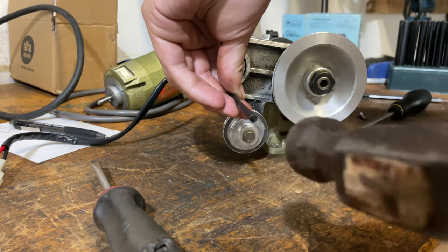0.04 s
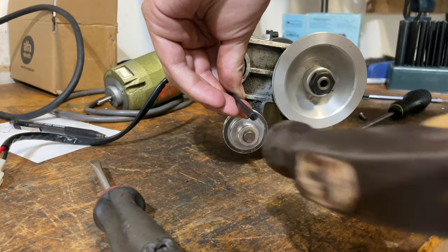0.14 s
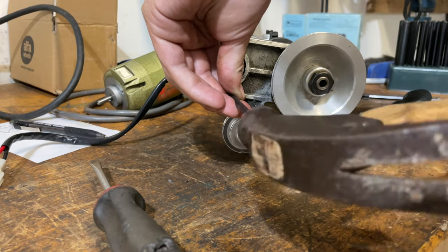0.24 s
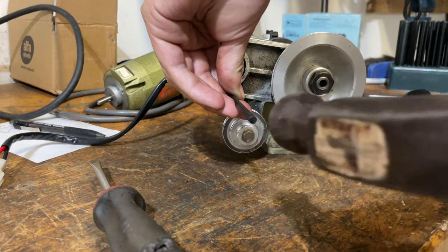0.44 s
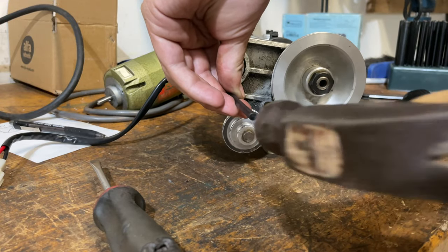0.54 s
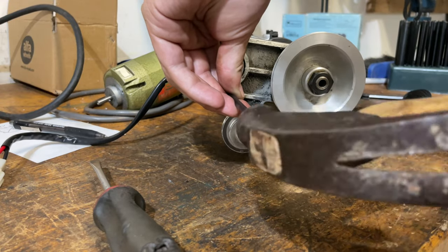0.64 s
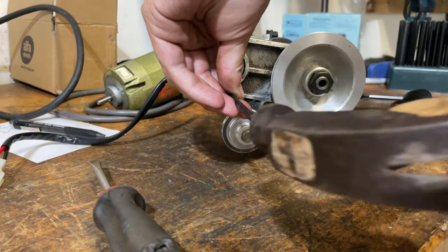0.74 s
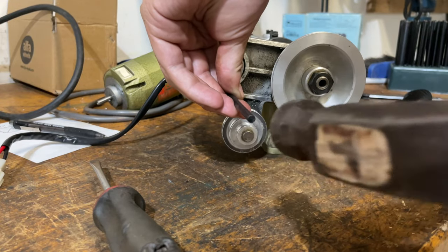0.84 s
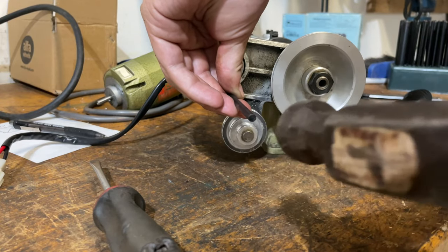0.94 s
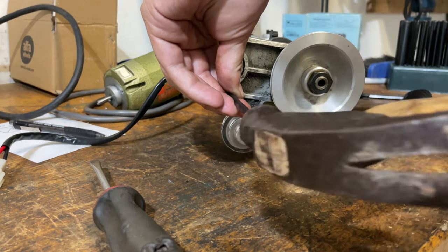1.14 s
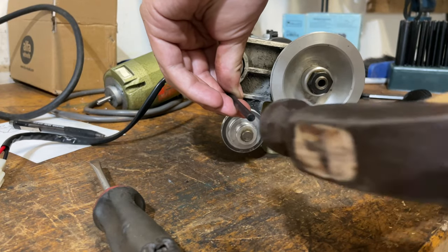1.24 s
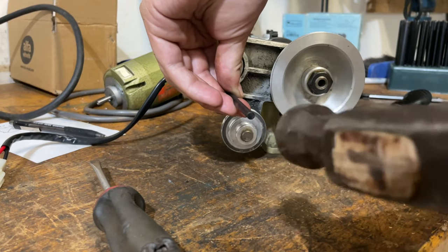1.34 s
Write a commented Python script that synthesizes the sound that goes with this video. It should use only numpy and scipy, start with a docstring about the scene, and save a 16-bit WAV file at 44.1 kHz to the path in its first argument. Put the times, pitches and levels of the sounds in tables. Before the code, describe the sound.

Hammer taps on a steel punch over a wooden workbench, heard close. The fading tail of an earlier tap opens over low room rumble. Sharp cracks follow at about 0.22, 0.62 and 1.08 seconds, each with a very short high steel ring and woody knock. Dull clacks come around 0.02 seconds later, doubled after the last. Peaks are softly overloaded; a small workshop rings on briefly.

```python
"""The fading tail of a hammer tap struck just before the start, over low room noise; then three more taps.
A hammer strikes a steel punch held in a metal part on a wooden workbench, close to the microphone.
Each tap is a noise crack and a short ring of dying sines for the steel, then modes and noise for the bench.
A small workshop rings on as decaying noise, and dull clacks follow as the work drops back on the bench.
The loud attacks overload the microphone: a soft limiter rounds their peaks."""
import sys
import numpy as np
from scipy import signal
from scipy.fft import rfft, irfft
from scipy.io import wavfile

SR = 44100
rng = np.random.default_rng(int(sys.argv[2]) if len(sys.argv) > 2 else 0)


def transcribe(signal):
    """Save signal, clipped to [-1, 1], as a 16-bit WAV file at the path in sys.argv[1]."""
    frames = np.atleast_2d(signal).T
    limited = np.clip(frames, -1, 1)
    pcm = np.round(limited * 32767).astype(np.int16)
    wavfile.write(sys.argv[1], SR, pcm)


N = 61739  # length in samples

# hammer taps, each with its own balance: start_s, force_db, bench_db, bench_tilt_db_per_octave,
# plate_db, plate_tilt_db_per_octave, punch_db, treble_db
TAPS = [(-0.21, 0.5, -9.5, 9.5, 5, 13, -2.5, -8), (0.2215, -0.5, 2.5, -0.5, 6, 3, -5, -1.5),
        (0.6204, -2, 2.5, -1, 2.5, 15, -5.5, -6.5), (1.0769, -0.5, 2.5, -0.5, -10.5, 7.5, 1, -0.5)]
# the work dropping back on the bench: start_s, level_db
REBOUNDS = [(0.2479, -9), (0.6408, -7), (1.0976, -10.5), (1.1083, -9.5)]

# steady room noise: frequency_hz, relative_level_db (per Hz)
FLOOR_SPECTRUM = [(10, 14.5), (45, -3), (80, -10), (130, -20.5), (180, -21), (350, -25), (900, -27.5),
                  (2000, -43), (8000, -51.5), (16000, -59)]
# workshop reverberation, decay by band: frequency_hz, t60_s
ROOM_T60 = [(60, 0.63), (150, .5), (400, 0.44), (1000, 0.5576), (2500, 0.53), (5000, 0.6062), (8000, 0.55),
            (11000, 0.5367), (13500, 0.42), (16000, 1.16)]
# diffuse wash that a tap leaves in the workshop: frequency_hz, relative_level_db (per Hz)
WASH_SPECTRUM = [(30, -4), (120, 1), (180, 2.5), (260, 2.5), (480, -2), (660, -2.5), (850, -2), (1200, -7),
                 (2000, -17.5), (3000, -19.5), (4000, -24), (5500, -20.5), (7000, -14.5), (8500, -14.5),
                 (10500, -22.5), (13500, -25), (16000, -34)]
# crack of steel on steel: frequency_hz, relative_level_db (per Hz)
CRACK_SPECTRUM = [(300, -4.5), (1500, -11.5), (2600, -5), (4000, -12.5), (5500, -7.5), (7000, -2),
                  (8200, 4.5), (9600, -1), (10800, -5), (13500, -10), (16000, -11.5)]
# dense higher modes of the bench and the things lying on it: frequency_hz, relative_level_db (per Hz)
WOOD_SPECTRUM = [(60, -7.5), (250, -18), (500, -2), (660, -4), (850, 0.5), (1250, -7.5), (1700, -15.5),
                 (2600, -22.5), (6000, -32)]

# modes of the hammer head: pitch_hz
HEAD_HZ = [4628, 6950, 7715, 8240, 8646, 9030, 9420]
# the same modes in order, balanced alike at every tap: level_db, t60_s
HEAD_MODES = [(-21.5, 0.063), (-32.5, 0.031), (-16, 0.058), (-14.5, 0.049), (-13, 0.039), (-16.5, 0.018),
              (-15.5, .025)]
# modes of the plate under the punch: pitch_hz
PLATE_HZ = [2300, 2647, 3285, 3600, 4391]
# the same modes in order, before tilt: level_db, t60_s
PLATE_MODES = [(-17.5, 0.022), (-34, 0.17), (-12.5, 0.022), (-9.5, 0.033), (-22, 0.061)]
# modes of the wooden bench top: pitch_hz
BENCH_HZ = [46, 116, 127, 152, 275, 364, 412, 490, 522, 570, 758, 824, 900, 990]
# the same modes in order, before tilt: level_db, t60_s
BENCH_MODES = [(-24, 0.39), (-15, 0.22), (-15.5, 0.12), (-26, 0.29), (-21.5, 0.29), (-19.5, 0.16),
               (-17, 0.14), (-5.5, 0.061), (-2, 0.044), (-11, 0.087), (-10.5, 0.094), (-12.5, 0.11),
               (-12.5, 0.08), (-20, 0.099)]

# levels in dB, times and t60 in seconds
FLOOR_DB, HUM_DB, HUM_HZ = -43.5, -62, 183
ROOM_DELAY_S, ROOM_BUILD_S, WASH_DB = 0.013, 0.0088, -19.5
# how strongly each ringing part feeds the room
HEAD_ROOM_DB, PLATE_ROOM_DB, PUNCH_ROOM_DB, BENCH_ROOM_DB = -15, -18, -9, -15.5
CRACK_DB, CRACK_RISE_S, CRACK_T60_S = 4, 0.0016, 0.011
CLATTER_DB, CLATTER_T60_S = -7, 0.049
TREBLE_HZ = 11000  # centre of the treble shelf's slope
STEEL_RISE_S = 0.0014
PUNCH_HZ, PUNCH_DB, PUNCH_T60_S = 7295, -5.5, 0.036
# pitches that a tilt leaves unchanged
BENCH_PIVOT_HZ, PLATE_PIVOT_HZ = 400, 3600
BENCH_LAG_S, BENCH_RISE_S = 0.0001, 0.00049
WOOD_DB, WOOD_RISE_S, WOOD_T60_S = -11, 0.0018, 0.1
ECHO_S, ECHO_DB = 0.009, -16  # reflection of the knock from a nearby surface
REBOUND_RISE_S, REBOUND_T60_S, REBOUND_CLICK_DB = 0.0025, 0.03, -22.5
OVERLOAD, KNEE = 0.97, 5  # limiter ceiling (1 = full scale) and hardness of its bend
EDGE_HZ = 15800  # upper band limit


def amp(db):
    """Decibels to gain."""
    return 10 ** (np.asarray(db) / 20)


def read(points, hz):
    """Reads a table on a log-frequency axis."""
    f, value = np.transpose(points)
    return np.interp(np.log(hz + 1), np.log(f + 1), value)


def add(mix, start_s, sound):
    """Mixes a sound in at its start time, which may lie before the scene begins."""
    at = round(start_s * SR)
    sound = sound[max(-at, 0):]
    part = mix[max(at, 0):][:len(sound)]
    part += sound[:len(part)]


def noise(spectrum, size):
    """Random-phase noise of rms 1, coloured by the given spectrum."""
    hz = np.fft.rfftfreq(size, 1 / SR)
    phases = np.exp(2j * np.pi * rng.random(len(hz)))
    x = irfft(amp(read(spectrum, hz)) * phases, size)
    return x / x.std()


def fade(t, t60_s):
    """Exponential decay that falls 60 dB in t60_s seconds."""
    return np.exp(-np.log(1000) * t / np.maximum(t60_s, 1e-4))


def rise(t, rise_s):
    """Soft attack from 0 to 1."""
    return 1 - np.exp(-(t / rise_s) ** 2)


def ring(pitches, modes, t, rise_s, sign=1):
    """Dying sines; sign -1 starts neighbours against each other, so the sound builds more slowly."""
    total = np.zeros(len(t))
    for k, (hz, (db, t60_s)) in enumerate(zip(pitches, modes)):
        total += sign ** k * amp(db) * fade(t, t60_s) * np.sin(2 * np.pi * hz * t)
    return rise(t, rise_s) * total


def tilted(pitches, modes, tilt_db, pivot_hz):
    """Tilts modes in dB per octave: the way the blow lands favours high or low ones."""
    return [(db + tilt_db * np.log2(hz / pivot_hz), t60_s)
            for hz, (db, t60_s) in zip(pitches, modes)]


def treble(x, db):
    """Raises or lowers the top of the spectrum with a steep shelf."""
    hz = np.fft.rfftfreq(len(x), 1 / SR)
    shelf = 1 / (1 + (TREBLE_HZ / (hz + 1)) ** 16)
    return irfft(rfft(x) * amp(db * shelf), len(x))


def background():
    """Low room rumble as shaped noise, with a faint steady sine for the hum."""
    rumble = amp(FLOOR_DB) * noise(FLOOR_SPECTRUM, N)
    hum = amp(HUM_DB) * np.sin(2 * np.pi * HUM_HZ * np.arange(N) / SR)
    return rumble + hum


def tail(x):
    """Shapes one second of noise into the room's tail, each band dying at its own speed."""
    hz, t, bands = signal.stft(x, SR, nperseg=256)
    decay = fade(t, read(ROOM_T60, hz)[:, None])
    x = signal.istft(bands * decay, SR, nperseg=256)[1][:SR]
    since_arrival = np.maximum(np.arange(SR) / SR - ROOM_DELAY_S, 0)
    return x * rise(since_arrival, ROOM_BUILD_S)


def workshop(notes, treble_db):
    """The room's answer to one tap: notes lingering through a noise reverb, and a broad wash."""
    response = tail(rng.standard_normal(SR))
    response = response / np.linalg.norm(response)
    lingering = signal.fftconvolve(notes, response)[:SR]
    wash = tail(treble(noise(WASH_SPECTRUM, SR), treble_db))
    return lingering + amp(WASH_DB) * wash


def crack(t, treble_db):
    """Steel on steel: one noise burst with a fast decay for the crack and a slower one for the clatter."""
    level = amp(CRACK_DB) * fade(t, CRACK_T60_S) + amp(CLATTER_DB) * fade(t, CLATTER_T60_S)
    burst = treble(noise(CRACK_SPECTRUM, len(t)), treble_db)
    return burst * rise(t, CRACK_RISE_S) * level


def hammer_head(t):
    """The steel head rings at its own high modes."""
    return ring(HEAD_HZ, HEAD_MODES, t, STEEL_RISE_S)


def plate(t, tilt_db):
    """The plate under the punch rings, its modes weighted by how the blow lands."""
    modes = tilted(PLATE_HZ, PLATE_MODES, tilt_db, PLATE_PIVOT_HZ)
    return ring(PLATE_HZ, modes, t, STEEL_RISE_S)


def punch(t):
    """The punch sounds a single short note of its own."""
    return ring([PUNCH_HZ], [(PUNCH_DB, PUNCH_T60_S)], t, STEEL_RISE_S)


def bench(t, tilt_db):
    """The blow reaches the bench top a moment later; a harder contact favours its higher modes."""
    t = np.maximum(t - BENCH_LAG_S, 0)
    modes = tilted(BENCH_HZ, BENCH_MODES, tilt_db, BENCH_PIVOT_HZ)
    knock = ring(BENCH_HZ, modes, t, BENCH_RISE_S, sign=-1)
    wood = [(hz, db + tilt_db * np.log2(hz / BENCH_PIVOT_HZ)) for hz, db in WOOD_SPECTRUM]
    dense = noise(wood, len(t)) * rise(t, WOOD_RISE_S) * fade(t, WOOD_T60_S)
    knock = knock + amp(WOOD_DB) * dense
    add(knock, ECHO_S, amp(ECHO_DB) * knock)
    return knock


def tap(bench_db, bench_tilt_db, plate_db, plate_tilt_db, punch_db, treble_db):
    """One blow: crack, ringing steel and bench knock, with the room they excite."""
    t = np.arange(SR) / SR
    head_ring = hammer_head(t)
    plate_ring = amp(plate_db) * plate(t, plate_tilt_db)
    punch_ring = amp(punch_db) * punch(t)
    knock = amp(bench_db) * bench(t, bench_tilt_db)
    room_send = amp(HEAD_ROOM_DB) * head_ring + amp(PLATE_ROOM_DB) * plate_ring
    room_send += amp(PUNCH_ROOM_DB) * punch_ring + amp(BENCH_ROOM_DB) * knock
    direct = crack(t, treble_db) + head_ring + plate_ring + punch_ring + knock
    return direct + workshop(room_send, treble_db)


def rebound():
    """The work lands again: a small dull clack of wood noise with a trace of steel."""
    t = np.arange(SR // 10) / SR
    clack = noise(WOOD_SPECTRUM, len(t)) + amp(REBOUND_CLICK_DB) * noise(CRACK_SPECTRUM, len(t))
    return clack * rise(t, REBOUND_RISE_S) * fade(t, REBOUND_T60_S)


def scene():
    """The taps and their rebounds over the background."""
    mix = background()
    for start_s, force_db, *balance in TAPS:
        add(mix, start_s, amp(force_db) * tap(*balance))
    for start_s, level_db in REBOUNDS:
        add(mix, start_s, amp(level_db) * rebound())
    return mix[None]


def record(dry):
    """The microphone overloads softly on loud attacks; a low-pass filter then limits the band."""
    limited = dry / (1 + abs(dry / OVERLOAD) ** KNEE) ** (1 / KNEE)
    low_pass = signal.firwin(255, EDGE_HZ, window=("kaiser", 8), fs=SR)
    return signal.oaconvolve(limited, low_pass[None], "same")


dry = scene()
out = record(dry)
transcribe(out)
```